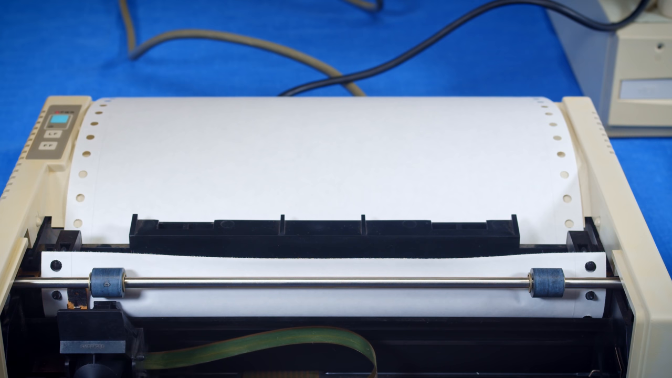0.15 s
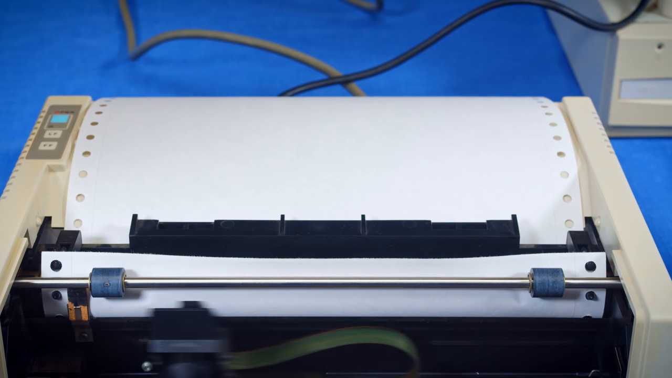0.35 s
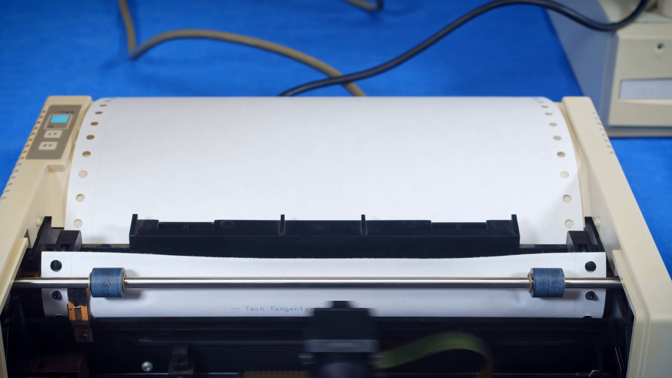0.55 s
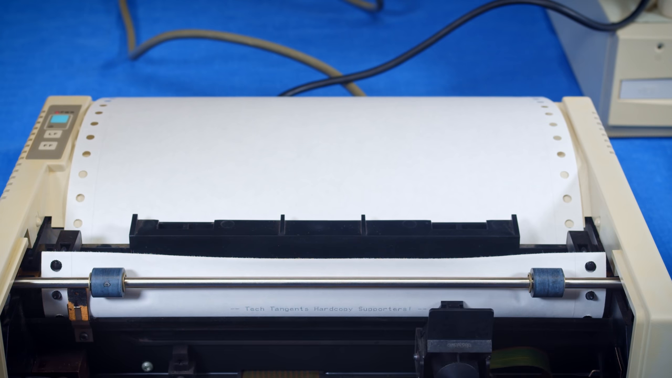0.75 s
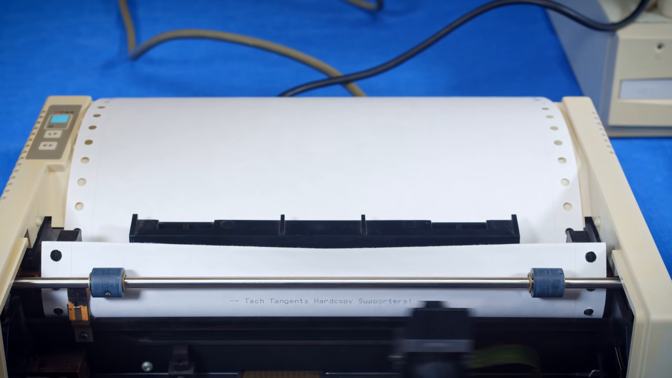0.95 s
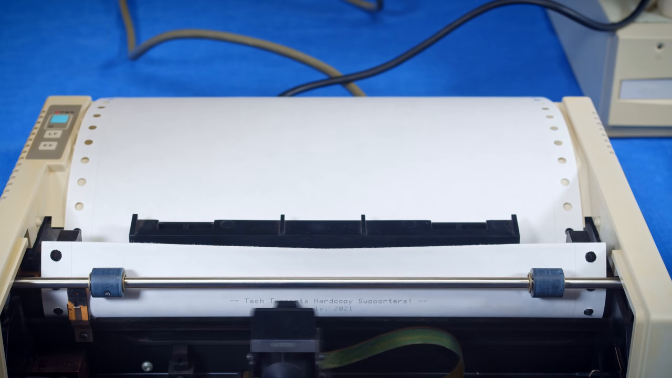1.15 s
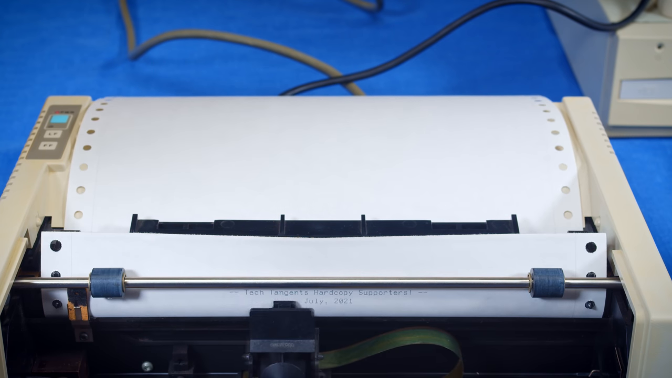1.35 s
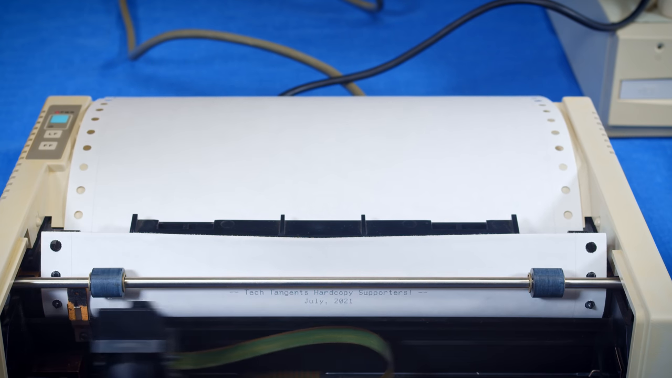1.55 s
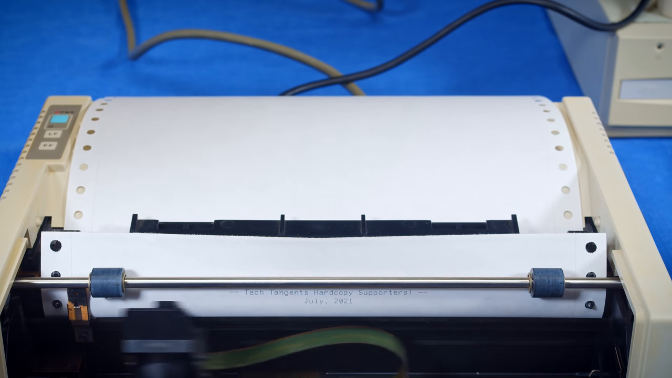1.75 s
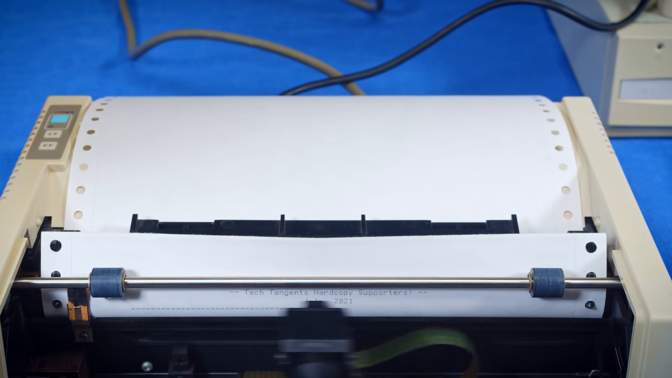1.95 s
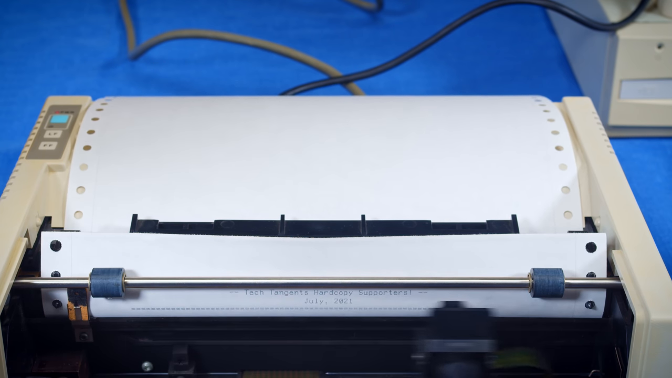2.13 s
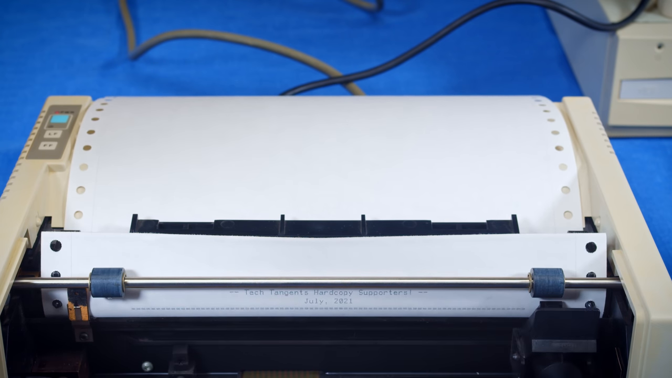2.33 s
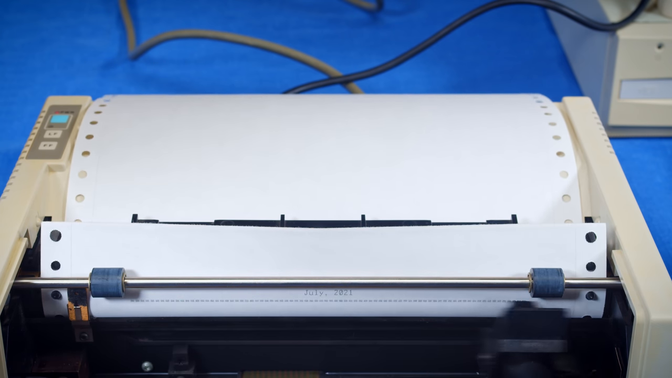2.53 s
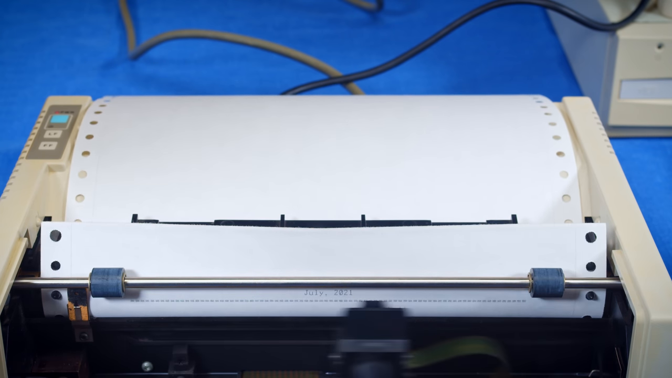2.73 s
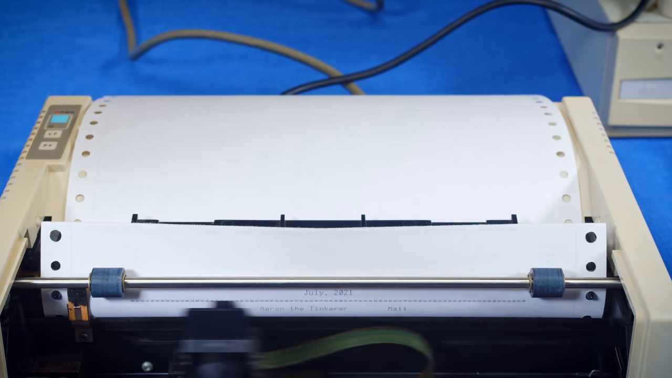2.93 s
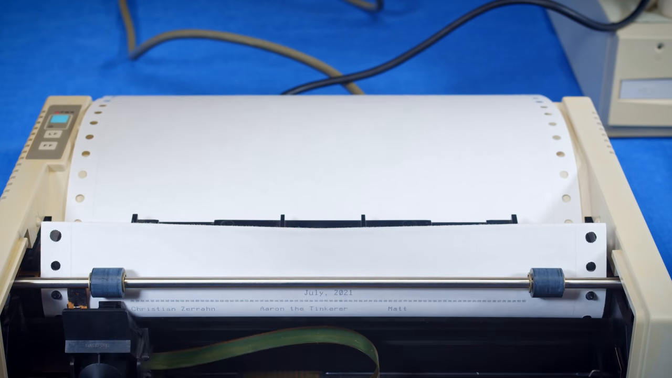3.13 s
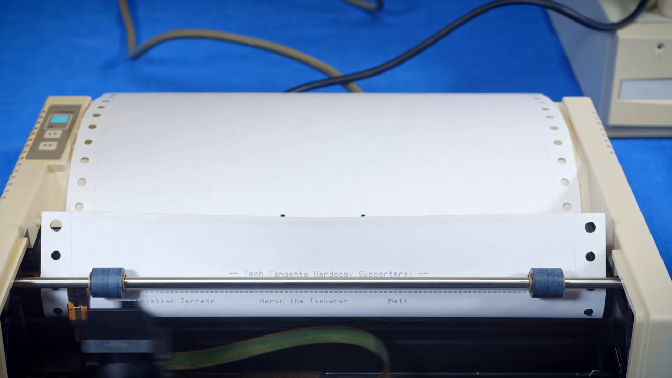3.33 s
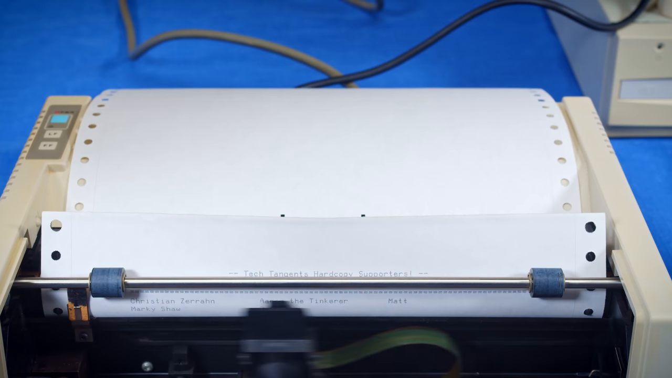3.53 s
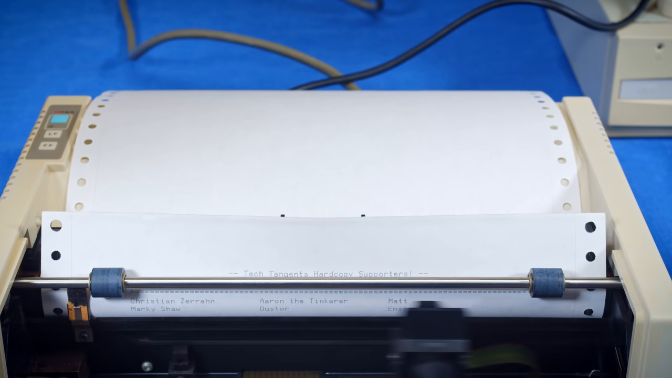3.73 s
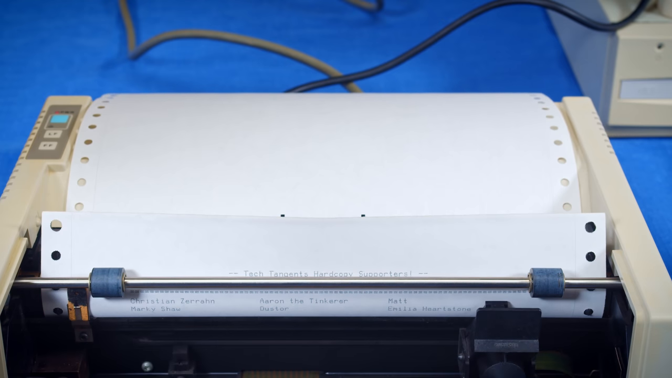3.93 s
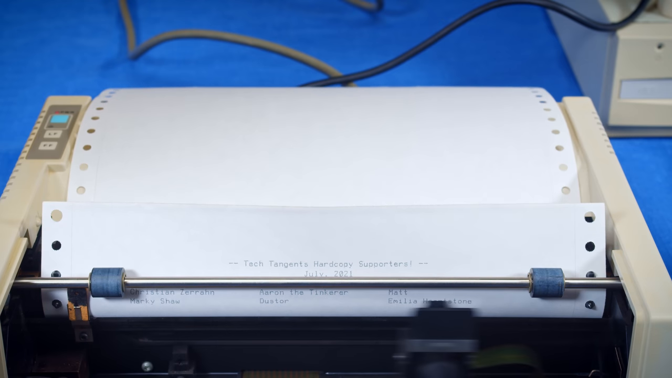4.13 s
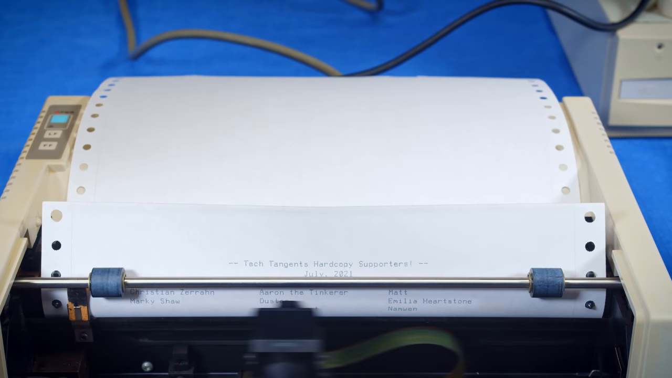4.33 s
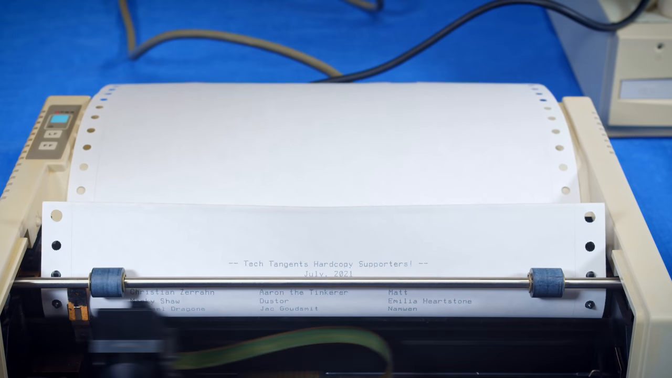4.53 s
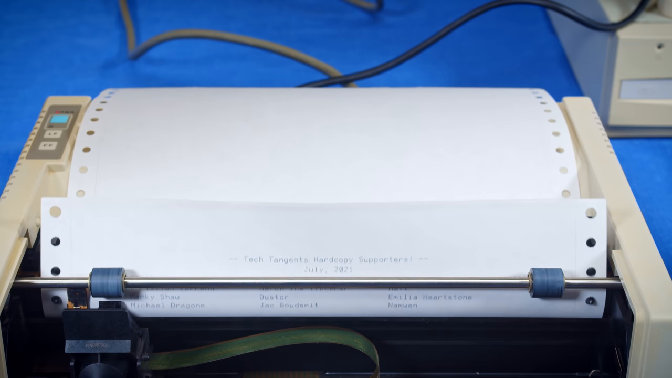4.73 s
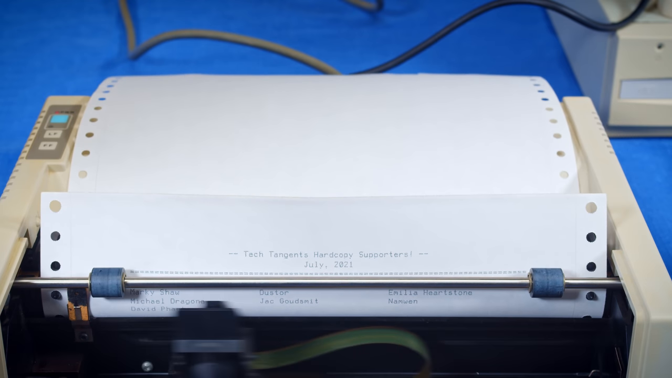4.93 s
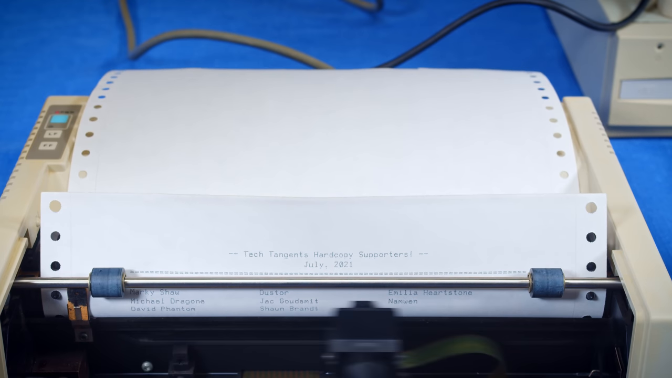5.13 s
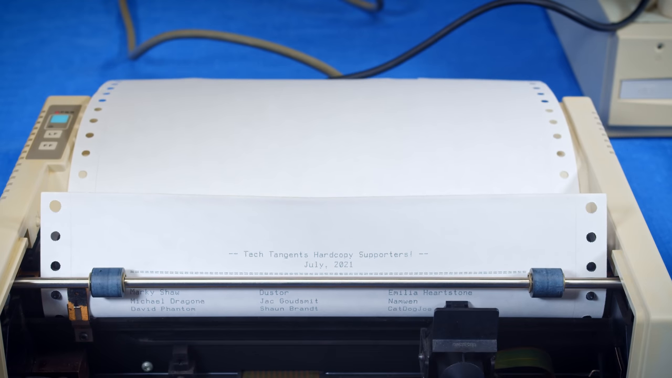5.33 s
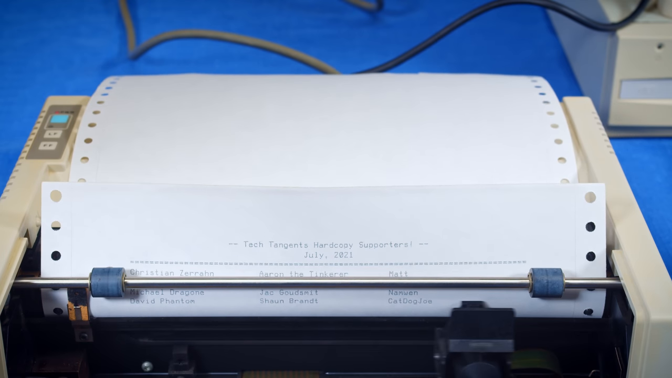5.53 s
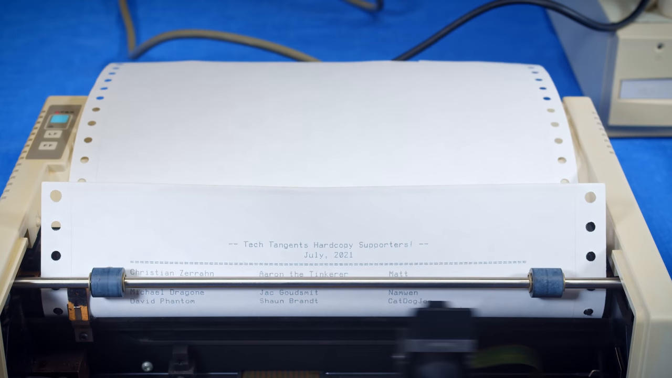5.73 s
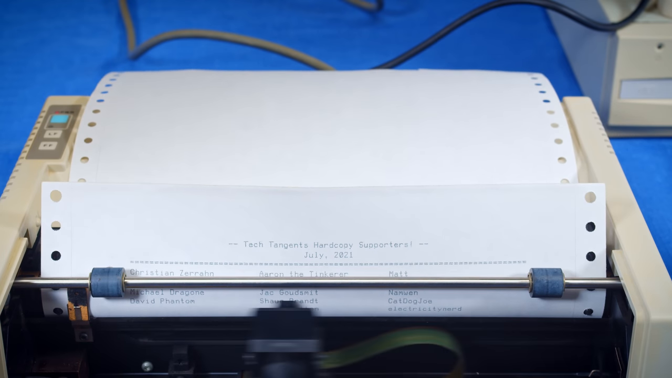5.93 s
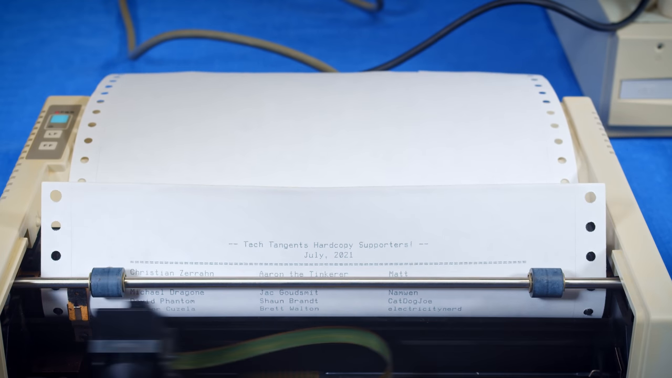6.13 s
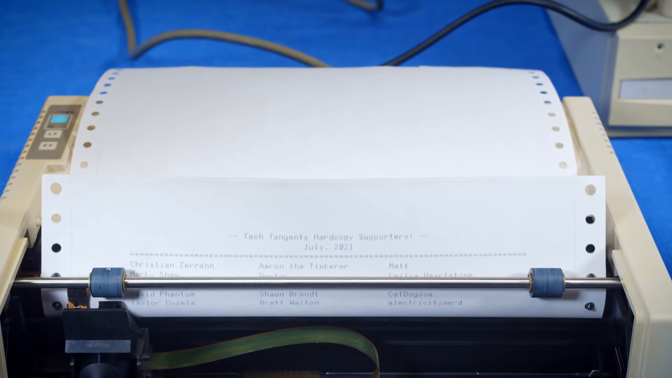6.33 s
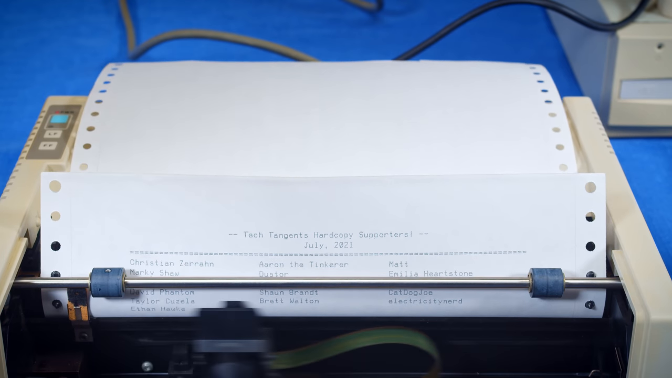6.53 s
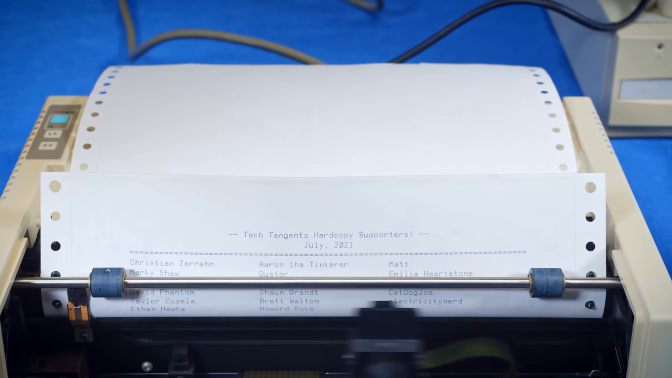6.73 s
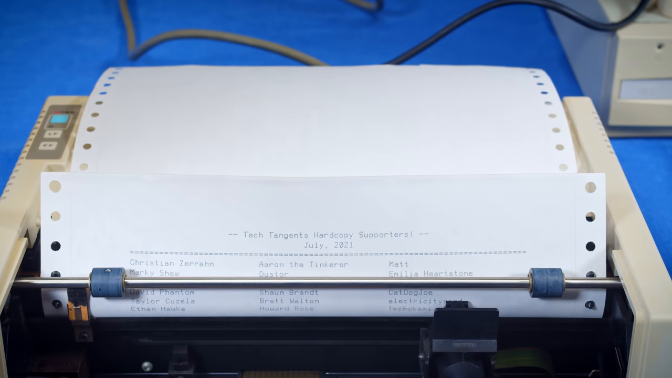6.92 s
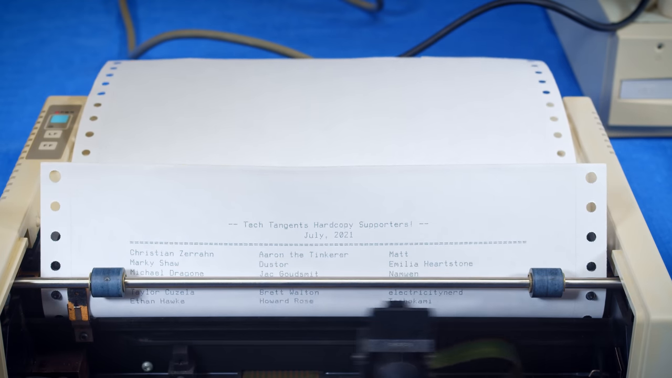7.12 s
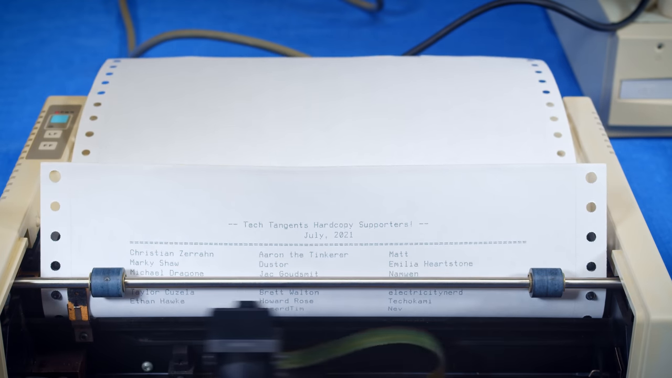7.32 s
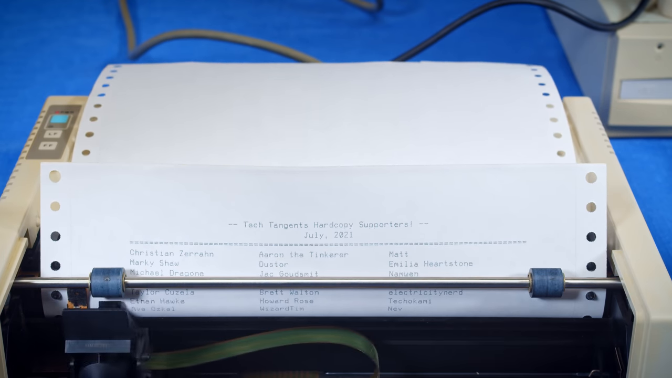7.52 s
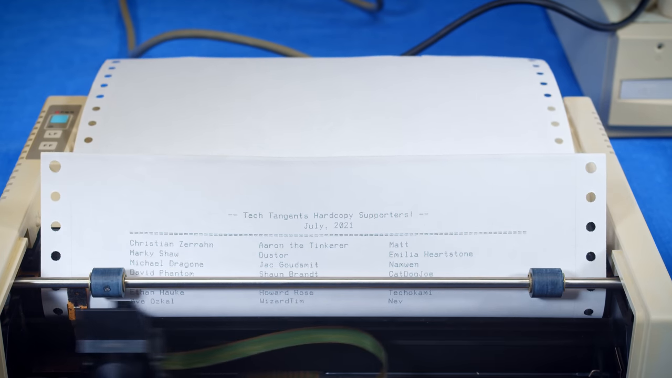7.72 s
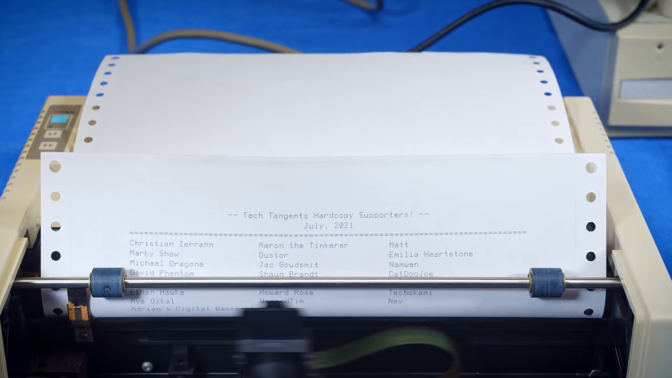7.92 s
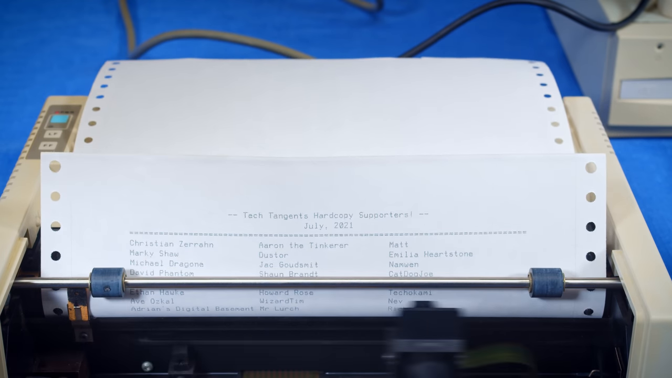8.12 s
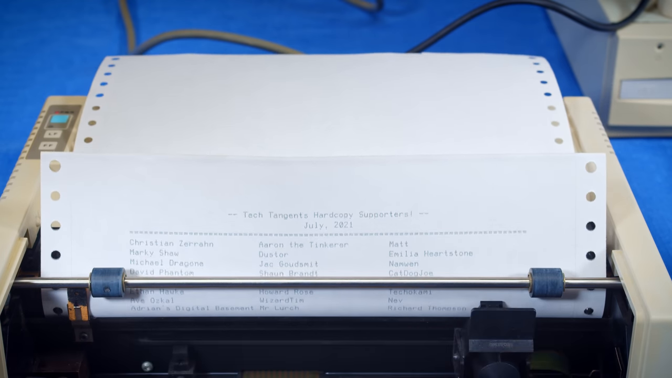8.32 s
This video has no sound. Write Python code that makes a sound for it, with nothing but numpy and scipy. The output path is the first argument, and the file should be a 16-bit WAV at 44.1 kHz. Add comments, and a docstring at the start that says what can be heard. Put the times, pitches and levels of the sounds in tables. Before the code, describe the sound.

A dot-matrix printer runs its head back and forth close up, buzzing and rattling, with sharp clacks and ticking paper feeds between passes.

```python
"""A faint scrape over room tone, then a dot-matrix printer runs its head to and fro, heard close up on its desk.
Passes start with a clack and a lurch: shaped noise rattles and hisses, sine orders of a pulley hum, a driver whines.
The head stops with a clack and the drive brakes; a clutch ticks and eight motor steps kick and drag the paper.
Snaps, clunks and clacks are crackle bursts with ringing panels; the sheet rasps in patches of noise in the first line."""
import sys
import numpy as np
from scipy import signal
from scipy.fft import rfft, irfft
from scipy.io import wavfile
from scipy.ndimage import uniform_filter1d

SR = 44100
rng = np.random.default_rng(int(sys.argv[2]) if len(sys.argv) > 2 else 0)


def wav_record(signal):
    """Record a signal, one row per channel, as 16-bit PCM in the file named by sys.argv[1]."""
    frames = np.transpose(np.atleast_2d(signal))
    bounded = np.clip(frames, -1, 1)
    # unit amplitude maps onto the largest positive 16-bit level
    quanta = np.round(bounded * 32767).astype(np.int16)
    wavfile.write(sys.argv[1], SR, quanta)


N = 373527

# Colour of the room tone: pitch_hz [Hz], level_db [relative dB per Hz]
ROOM_COLOUR = [(12, -20.5), (20, 8.5), (294, -1), (367, -14), (1990, -22), (2850, -22.5), (3360, -26),
               (5850, -23.5), (6910, -23.5), (11100, -33), (15000, -46)]
ROOM_DB = -49.5

# Snaps, clunks, a scrape and a rebound of paper, case and head: start_s [s], peak_db [dB],
# treble_db [dB above peak], knock_db [case, dB], length_ms [ms], tilt_db [dB per octave]
LOOSE_BLOWS = [(0.0716, -29.5, -10, -33, 51, -14.5), (0.128, -36, -10, -24.5, 8, -6),
               (0.9266, -2.5, -8.5, -19.5, 3.55, -3.5), (1.4704, -28, 11, -21, 2.8, 0),
               (2.4951, -22.5, -1.5, -34.5, 3.88, -9), (2.6798, -21, -17, -33.5, 3.8, -2),
               (3.3266, -26.5, -2, -31.5, 4, -9), (4.7906, -24, -4, -37, 8.4, -15),
               (4.8038, -18, -17.5, -28, 8, -16.5), (5.5506, -32, -0.5, -43.5, 2.7, 0),
               (5.5895, -28, 4, -28, 3, 0), (5.5994, -27, 6, -28, 3, 1.5), (5.6346, -32, 16, -28, 2.1, 0),
               (5.6562, -27, 5, -19.5, 2.5, 0), (5.6728, -27, 3, -22, 3.2, 4),
               (5.7673, -14, -2.5, -21, 5.4, -12), (5.7852, -28, 9, -20.5, 2.9, 0),
               (7.0413, -18, -6.5, -22, 8, -14), (8.252, -28, 2, -23.5, 2.3, 0)]
LOOSE_THUMP_DB = -35.5
# Colour of the crackle in every blow: pitch_hz [Hz], level_db [relative dB per Hz]
CRACKLE_COLOUR = [(880, -55), (1500, -20.5), (2230, -16), (2920, -15.5), (3570, -9.5), (4910, -4),
                  (6880, -14), (7230, -6), (8150, -10.5), (13500, -18), (16200, -55)]
SPIKE = 4.1  # sharp core added to crackle of rms 1
# Ringing case panels: pitch_hz [Hz], level_db [relative dB], t60_s [s]
CASE_MODES = [(494.4, -6.5, 0.12), (720, 6, 0.017), (1067, -1, 0.023), (1392, 2, 0.028), (2054, -7, 0.0279)]
# Ringing of the printer on its desk: pitch_hz [Hz], level_db [relative dB], t60_s [s]
DESK_MODES = [(93.3, -4, 0.16), (134.6, 6.5, 0.16), (174, 2, 0.071), (237.6, -0.5, 0.1984)]

# Head passes: start_s [s], stop_s [s], mark_s [s, pulley passes its mark], way [0 back, 1 out],
# rattle_db [dB], hiss_db [ribbon and paper, dB above rattle], hum_db [dB on gears, ping, whine and stop strain],
# lurch_db [case, dB], swell_db [hiss in mid-pass, dB], start_clack_db [dB], stop_clack_db [dB]
PASSES = [(0.108, 0.2214, 0.099, 1, -46.5, -10, -11, -35.5, 3.5, -16.5, -28),
          (0.3245, 0.8009, 0.563, 1, -39.5, -2, -0.5, -36.5, 2, -8.5, -25),
          (1.014, 1.249, 1.292, 0, -38, -5, -1, -36, -0.5, -28, -11.5),
          (1.4446, 1.6848, 1.5, 0, -39, -7, -1.5, -32.5, 2, -3.5, -17.5),
          (1.7695, 2.364, 1.83, 1, -40, -5, 0.5, -42, 0, -19, -34),
          (2.582, 3.185, 2.662, 0, -38.5, -5.5, -0.5, -31.5, 0, -17, -15),
          (3.401, 3.927, 3.629, 1, -40.5, -6, -1, -50, 1.5, -40, -25.5),
          (4.143, 4.6713, 4.481, 0, -38, -5.5, -1.5, -40, 0, -35.5, -14),
          (4.886, 5.3599, 5.116, 1, -40.5, -5.5, -0.5, -50, 1, -40, -18),
          (5.5666, 5.682, 5.601, 0, -40.5, -7, -4, -37, -8.5, -7, -16),
          (5.7572, 6.2707, 5.914, 0, -38.5, -6.5, -0.5, -33.5, 0.5, -14.5, -15),
          (6.453, 6.934, 6.524, 1, -40, -4.5, -1, -42.5, 0.5, -41, -19),
          (7.1217, 7.6, 7.242, 0, -38, -5.5, -1, -35, -1, -28, -14.5),
          (7.788, 8.309, 7.852, 1, -40.5, -5.5, -1, -46, 1.5, -41, -24.5)]
# Clack voices: treble_db [dB above peak], knock_db [dB], thump_db [desk, dB], length_ms [ms], tilt_db [dB per octave]
START_VOICE = (-6, -27, -32.5, 4.5, 1.5)
REBOUND_VOICE = (-3.5, -20.5, -33, 4, -6)
TICK_VOICE = (-15, -34, -38, 4, -1)
# Stop clack voices, a row for back and a row for out: same columns
STOP_VOICES = [(-5.5, -23, -30.5, 4.47, 0), (-10, -23, -48, 3.62, 0)]
# Rebound peak = REBOUND_DB + REBOUND_SHARE * start clack in dB: harder after a hard start
REBOUND_S, REBOUND_DB, REBOUND_SHARE = 0.0118, -16, 0.54
TICK_S, TICK_DB = (0.0868, 0.0908), (-27, -32.5)  # clutch tick after the stop: back, out

# Colour of the case rumble: pitch_hz [Hz], level_db [relative dB per Hz]
RUMBLE_COLOUR = [(24, -43.5), (40, -16), (91, -7), (134, -0.5), (178, -2.5), (198, -8.5), (300, -15.5),
                 (390, -46), (660, -120)]
RUMBLE_DB, LURCH_S = -54.5, 0.024  # steady rumble; the lurch peaks this long after the start
STRAIN_DB, STRAIN_S = -39, 0.016  # swell around the stop before hum_db is added, and its width

MESH_HZ, TEETH = 541.0, 90  # tooth rate at full speed; teeth per pulley turn
# Tight spots, a list for back and a list for out: turn_part [0-1], bump_db [relative dB]
TIGHT_SPOTS = [
    [(0., 2), (.125, -5.5), (.31, -1.5), (.495, 2.5), (.62, -7.5), (.82, -2), (.91, -8.5)],
    [(.055, -6), (.23, -30), (.33, -0.5), (.435, -1), (.56, -11), (.735, -6), (.92, -1)],
]
# Rattle colour, a list for back and a list for out: pitch_hz [Hz], level_db [relative dB per Hz]
RATTLE_COLOUR = [
    [(150, -27.5), (300, -18), (800, -9.5), (1300, -9), (2400, -14), (3000, -13.5), (4300, -7),
     (5500, -9.5), (7000, -19), (9000, -50)],
    [(150, -28), (300, -15.5), (800, -6.5), (1300, -6.5), (2400, -7.5), (3000, -9.5), (4300, -5.5),
     (5500, -7.5), (7000, -16), (9000, -45)],
]
# Resonances and dead spots of carriage and frame: pitch_hz [Hz], width_hz [Hz], back_db [dB], out_db [dB]
FRAME = [(630, 130, 2, 6.5), (870, 136, -1.5, -6), (1130, 60, 3.5, 5.5), (1579, 51, 5.5, 6.5),
         (2206, 44, 3.5, 4), (2360, 80, -3.5, 0.5), (2703, 104, 5, 4.5), (2860, 73, -6.5, -1),
         (3840, 92, 4.5, 2), (4048, 60, -10, -2.5), (4150, 79, 5.5, 4)]
# How much rattle returns every turn: pitch_hz [Hz], share [0-1]
REPEATS = [(200, 1), (1500, 0.92), (3000, 0.63), (4000, 0.019)]
CREEP_S = 0.015  # fade-in of a head that sets off with hardly any clack
BRAKE_S, BRAKE_DB = 0.028, -9  # run-on after the stop and its drop in rattle
BRAKE_SLOWING = 0.45  # share of speed lost during the run-on
# Colour of ribbon and paper hiss: pitch_hz [Hz], level_db [relative dB per Hz]
HISS_COLOUR = [(4350, -49), (7400, 3.5), (8120, 4), (8800, 1.5), (9960, 5), (13700, -8.5), (15500, -21.5)]

# Gear tones: order [multiple of the pulley turn], back_db [dB], out_db [dB], before hum_db; every 90th is a mesh tone
GEARS = [(10, -58, -59), (14, -58, -59), (16, -61, -55), (18, -60, -60), (20, -52, -56), (22, -45, -51),
         (23, -56, -55), (24, -54, -53), (26, -51, -62), (28, -53, -54), (30, -59, -59), (39, -61, -60),
         (82, -61, -58), (84, -59, -58), (85, -53, -66), (90, -44.5, -48.5), (95, -53, -64),
         (104, -60, -62), (175, -57, -64), (180, -51, -48.5), (185, -57, -62), (190, -58, -60),
         (220, -55, -61), (264, -66, -56), (270, -58, -47.5), (360, -56, -54), (450, -59, -51),
         (720, -58, -61)]
# Part of a turn, back and out, where the low orders in the given range line up
THROB_AT, THROB_ORDERS = (0.98, 0.45), (20, 28)
SIDE_ORDERS = 5  # tones this near a mesh harmonic keep step with it: the buzz throbs five times a turn
# Once-a-turn ping, a row for back and a row for out: pitch_hz [Hz], turn_part [0-1], level_db [before hum_db], t60_s [s]
PINGS = [(2280.6, 0.95, -28.5, 0.046), (2195, 1, -34, 0.054)]
WHINE_HZ, WHINE_DB = 8413.0, -49.5  # motor driver, before hum_db
WHINE_LATE_S, WHINE_EARLY_S = 0.04, 0.015  # begins after the start, ends before the stop

# Colour of the paper rasp: pitch_hz [Hz], level_db [relative dB per Hz]
RUB_COLOUR = [(2500, -30), (4000, -3), (5300, 6), (6300, -6), (8200, -4), (12500, -2), (14500, -5),
              (16000, -20)]
RUB_S, RUB_DB, RUB_FADE_S = (0.44, 0.8), -38.5, 0.045  # from and to, level, fade at each end

# Line feeds: start_s [s], hiss_db [paper, dB before the puff shape], thump_db [third step, dB]
FEEDS = [(.915, -47.5, -28), (1.347, -44, -30), (2.482, -44, -26.5), (3.299, -46, -27), (4.042, -45, -29),
         (4.786, -44.5, -29.5), (5.468, -44, -26), (6.362, -44.5, -28.5), (7.023, -45, -29.5),
         (7.688, -46, -29.5), (8.398, -45, -31)]
STEP_S, STEPS = 0.0108, 8
# Colour of the dragged paper: pitch_hz [Hz], level_db [relative dB per Hz]
SLIDE_COLOUR = [(180, -51), (300, -5.5), (476, 0), (781, -12), (937, -9.5), (1780, -12), (3690, -8),
                (6250, -16.5), (9450, -12.5), (13600, -20), (15500, -33.5)]

# Echo decay: pitch_hz [Hz], t60_s [s]
ECHO_DECAY = [(200, 0.42), (1000, 0.14), (4000, 0.13), (12000, 0.1)]
NOTCH_HZ, EDGE_HZ = 7230, 16300  # microphone notch, also the split for clack treble; band limit


def amp(db):
    """Decibels to amplitude."""
    return 10 ** (np.asarray(db) / 20)


def evened(x):
    """Scale to rms 1."""
    return x / np.sqrt(np.mean(x ** 2) + 1e-20)


def read(points, hz):
    """Read a curve at hz, interpolating along log frequency."""
    f, value = np.transpose(points)
    return np.interp(np.log(hz + 1), np.log(f + 1), value)


def add(mix, s, sound):
    """Lay a sound into the mix at s seconds."""
    part = mix[max(round(s * SR), 0):][:len(sound)]
    part += sound[:len(part)]


def noise(spectrum, count, share=lambda hz: 1, band=(0, SR)):
    """Looping coloured noise, rms 1 inside the band before only a share of its power is kept."""
    hz = np.fft.rfftfreq(count, 1 / SR)
    gain = amp(read(spectrum, hz))
    inside = (hz >= band[0]) & (hz < band[1])
    gain /= np.sqrt(np.sum(gain[inside] ** 2) / len(hz))
    return irfft(rfft(rng.standard_normal(count)) * gain * np.sqrt(share(hz)), count)


def slow_wander(count, width):
    """Smoothed random drift of rms 1."""
    return evened(uniform_filter1d(rng.standard_normal(count), width))


def ramp(x):
    """Hold a fade between silent and full."""
    return np.clip(x, 0, 1)


def ring(modes):
    """Dying tones of a struck body, scaled to peak 1."""
    t = np.arange(SR // 4) / SR
    out = sum(amp(db - 60 * t / t60) * np.sin(2 * np.pi * hz * t) for hz, db, t60 in modes)
    return out / abs(out).max()


def room_tone():
    """Steady coloured noise of the room."""
    return amp(ROOM_DB) * noise(ROOM_COLOUR, N)


def blows():
    """List loose blows, starts, rebounds, stops and ticks as (start_s, peak_db, voice columns)."""
    rows = [(s, db, treble_db, knock_db, LOOSE_THUMP_DB, ms, tilt)
            for s, db, treble_db, knock_db, ms, tilt in LOOSE_BLOWS]
    for start, stop, _, way, *_, start_db, stop_db in PASSES:
        way = round(way)
        rebound_db = REBOUND_DB + REBOUND_SHARE * start_db
        rows += [(start, start_db, *START_VOICE),
                 (start + REBOUND_S, rebound_db, *REBOUND_VOICE),
                 (stop, stop_db, *STOP_VOICES[way])]
        if any(0 < feed[0] - stop < 0.14 for feed in FEEDS):  # the clutch ticks only ahead of a line feed
            rows += [(stop + TICK_S[way], TICK_DB[way], *TICK_VOICE)]
    return rows


def clacks():
    """Short bursts of crackle, with the case panels and the desk ringing under them."""
    out, t = np.zeros(N), np.arange(4096) / SR
    knock, thump = ring(CASE_MODES), ring(DESK_MODES)
    hz = np.fft.rfftfreq(4096, 1 / SR)
    colour_db = read(CRACKLE_COLOUR, hz)
    for s, db, treble_db, knock_db, thump_db, ms, tilt in blows():
        u = t / (max(ms, 0.3) / 1000)
        sharp_start = np.minimum(t / 0.005, 0.3) * (u < 0.5) * (ms > 15)  # for long scrapes
        shape = np.maximum(u ** 2.1, sharp_start) * np.exp(-4.2 * u)
        shape /= shape.max()
        grit = rng.standard_normal(len(t)) + SPIKE * (np.arange(len(t)) == shape.argmax())
        burst = rfft(grit * np.roll(shape, 44))
        tilt_db = tilt * np.log2(hz / 4000 + 0.082)  # tilts only the part below the split
        low = irfft(burst * amp(colour_db + tilt_db) * (hz < NOTCH_HZ))
        high = irfft(burst * amp(colour_db) * (hz >= NOTCH_HZ))
        crackle = low / abs(low).max() + amp(treble_db) * high / abs(high).max()
        add(out, s - 0.002, amp(db) * crackle)
        add(out, s, amp(min(knock_db, db + 8.5)) * knock + amp(thump_db) * thump)  # weak blows knock less
    return out


def case_rumble(t, start, stop, lurch_db, hum_db):
    """Low noise of the case, swelling after the start and into the stop."""
    u = (t - start) / LURCH_S
    lurch = amp(lurch_db) * u ** 2 * np.exp(2 - 2 * u)
    strain = amp(STRAIN_DB + hum_db) * np.exp(-((t - stop) / STRAIN_S) ** 2)
    return (amp(RUMBLE_DB) + lurch + strain) * noise(RUMBLE_COLOUR, len(t))


def tight_pulse(turn, way):
    """Loudness pulses, rms 1, as the pulley passes its tight spots."""
    pulse = 0.599
    for at, db in TIGHT_SPOTS[way]:
        distance = (turn - at + 0.5) % 1 - 0.5
        pulse = pulse + amp(db) * np.exp(-(distance / 0.025) ** 2)
    return evened(pulse)


def rattle_colour(way):
    """The broad rattle spectrum with the frame's resonances laid on it."""
    hz = np.arange(100, 10000, 20.0)
    bumps = sum(row[2 + way] * np.exp(-((hz - row[0]) / row[1]) ** 2) for row in FRAME)
    return np.transpose([hz, read(RATTLE_COLOUR[way], hz) + bumps])


def returning(hz):
    """Share of rattle power that repeats every turn."""
    return np.clip(read(REPEATS, hz), 0, 1)


def rattle_loop(way):
    """One pulley turn of repeating rattle, leaving out the orders that sound as gear tones."""
    orders = [gear[0] for gear in GEARS]
    between = lambda hz: returning(hz) * ~np.isin(np.arange(len(hz)), orders)
    return noise(rattle_colour(way), round(SR * TEETH / MESH_HZ), between, band=(3000, 6000))


def belt_rattle(turn, pulse, way, loop):
    """Fresh noise rippled by teeth and uneven in level, plus the loop that follows the pulley angle."""
    fresh = noise(rattle_colour(way), len(turn), lambda hz: 1 - returning(hz), band=(3000, 6000))
    same = loop[(turn % 1 * len(loop)).astype(int)]
    teeth = 1 + 0.089 * np.cos(2 * np.pi * TEETH * turn)
    level_drift = amp(1.84 * slow_wander(len(turn), 60) - 0.37)
    return fresh * pulse * teeth * level_drift + same * pulse ** 0.34


def paper_hiss(t, start, stop, swell_db, pulse):
    """Ribbon and paper noise that swells or sinks in mid-pass and ends at the stop."""
    swell = amp(swell_db * np.sin(np.pi * (t - start) / (stop - start)))
    return swell * noise(HISS_COLOUR, len(t), band=(8000, 13000)) * pulse ** 0.53 * (t <= stop)


def gear_phases():
    """Phases in turns, a row for back and a row for out, that set where the orders line up."""
    orders = np.array([gear[0] for gear in GEARS])
    low = (orders >= THROB_ORDERS[0]) & (orders <= THROB_ORDERS[1])
    phases = np.where(low, -np.outer(THROB_AT, orders), rng.random((2, len(GEARS))))
    mesh = np.round(orders / TEETH).astype(int)
    beside = orders - TEETH * mesh
    in_step = rng.random((2, mesh.max() + 1))[:, mesh] - np.outer(THROB_AT, beside)
    return np.where((mesh > 0) & (abs(beside) <= SIDE_ORDERS), in_step, phases)


def gear_hum(turn, late, pulse, way, phases):
    """Sines locked to the pulley: they swell at tight spots, flutter with backlash and sag in pitch on braking."""
    hush_db = 900 * late  # orders above the tooth count fade fast once the drive lets go
    hum = np.zeros(len(turn))
    for gear, phase in zip(GEARS, phases):
        level = amp(gear[1 + way] - hush_db * (gear[0] > TEETH))
        hum += level * np.sqrt(2) * np.sin(2 * np.pi * (gear[0] * turn + phase))
    hum *= 1 + 0.25 * (pulse - 1)
    hum *= amp(1.2 * slow_wander(len(turn), 900))  # backlash flutter
    return hum * amp(4.4 * np.minimum(late / 0.006, 1))  # low tones groan louder under braking


def pulley_ping(turn, way):
    """A dying tone struck once a turn."""
    hz, at, db, t60 = PINGS[way]
    since = (turn - at) % 1 * TEETH / MESH_HZ  # s at full speed
    return amp(db - 60 * since / t60) * np.sin(2 * np.pi * hz * since) * (1 - np.exp(-since / 0.0037))


def driver_whine(t, start, stop):
    """Steady high sine of the motor driver, faded in and out within the pass."""
    whine = amp(WHINE_DB) * np.sqrt(2) * np.sin(2 * np.pi * WHINE_HZ * t)
    return whine * ramp(np.minimum(t - start - WHINE_LATE_S, stop - WHINE_EARLY_S - t) / 0.011)


def head_pass(row, loops, phases):
    """One sweep: pulley angle drives rattle, hum and ping, then slows through the run-on."""
    start, stop, mark, way, rattle_db, hiss_db, hum_db, lurch_db, swell_db, start_db, _ = row
    way, t = round(way), np.arange(start, stop + BRAKE_S, 1 / SR)
    late = np.maximum(t - stop, 0)
    turn = (t - BRAKE_SLOWING * late ** 2 / (2 * BRAKE_S) - mark) * MESH_HZ / TEETH
    pulse = tight_pulse(turn, way)
    rattle_level = amp(rattle_db + BRAKE_DB * np.minimum(late / 0.0028, 1))
    rattle = rattle_level * belt_rattle(turn, pulse, way, loops[way])
    hiss = rattle_level * amp(hiss_db) * paper_hiss(t, start, stop, swell_db, pulse)
    rumble = case_rumble(t, start, stop, lurch_db, hum_db)
    tones = gear_hum(turn, late, pulse, way, phases[way]) + pulley_ping(turn, way)
    tones += driver_whine(t, start, stop)
    fade_in_s = CREEP_S if start_db < -36 else 0.0027
    edges = ramp(np.minimum((t - start) / fade_in_s, (t[-1] - t) / 0.015))
    running = ramp(np.minimum((t - start - 0.015) / 0.0065, (t[-1] - t) / 0.009))  # motor under way
    return edges * (rattle + hiss + rumble) + running * amp(hum_db) * tones


def brake_jolt():
    """Soft-edged ring of desk and case as the drive brakes."""
    jolt = amp(-28.5) * ring(DESK_MODES) + amp(-26) * ring(CASE_MODES)
    return jolt * (1 - np.exp(-np.arange(len(jolt)) / SR / 0.005))


def carriage():
    """All passes; each direction shares its repeating rattle and gear phases, outward ones end in a jolt."""
    out, jolt = np.zeros(N), brake_jolt()
    loops, phases = [rattle_loop(way) for way in (0, 1)], gear_phases()
    for row in PASSES:
        add(out, row[0], head_pass(row, loops, phases))
        add(out, row[1] + 0.012, round(row[3]) * jolt)
    return out


def paper_rub():
    """The fresh sheet rasps against the head: bright noise flaring in short narrow patches."""
    _, _, z = signal.stft(noise(RUB_COLOUR, SR // 2), SR, nperseg=512)
    across_pitch = uniform_filter1d(rng.standard_normal(z.shape), size=7, axis=0)
    patches = evened(uniform_filter1d(across_pitch, size=4, axis=1))
    rasp = evened(signal.istft(z * amp(4.5 * patches), SR, nperseg=512)[1])
    t, out = RUB_S[0] + np.arange(len(rasp)) / SR, np.zeros(N)
    fade = ramp(np.minimum(t - RUB_S[0], RUB_S[1] - t) / RUB_FADE_S)
    add(out, RUB_S[0], amp(RUB_DB) * rasp * fade)
    return out


def line_feeds():
    """Each motor step drags the paper with a short hiss and kicks the case and the desk."""
    slide, kicks = np.zeros(N), np.zeros(N)
    t = np.arange(round(1.47 * STEP_S * SR)) / SR
    puff = t / 0.00243 * np.exp(1 - t / 0.002662) + 0.15
    puff *= signal.windows.tukey(len(t), 0.2)
    for s, hiss_db, thump_db in FEEDS:
        for k in range(STEPS):
            jitter, hiss_chance, kick_chance = rng.standard_normal(3)
            at = s + STEP_S * (k + 0.099 * jitter)
            add(slide, at, amp(hiss_db + 0.76 * hiss_chance) * puff)
            kick_db = thump_db + 2.68 * kick_chance - 2.0 * abs(k - 2)  # pulls hardest around the third step
            add(kicks, at, amp(kick_db) * np.ones(1))
    body = ring(DESK_MODES) + amp(-10) * ring(CASE_MODES)
    return slide * noise(SLIDE_COLOUR, N, band=(500, 15000)) + signal.oaconvolve(kicks, body)[:N]


def echo(x):
    """Sparse taps of random sign, each band dying at its own speed."""
    taps = np.zeros(SR // 2)
    at = np.arange(150, SR // 2 - 20, 20)
    taps[at + rng.integers(0, 20, len(at))] = rng.choice([-1.0, 1.0], len(at))
    hz, t, z = signal.stft(taps, SR, nperseg=256)
    decay = amp(-60 * t / read(ECHO_DECAY, hz)[:, None])
    tail = signal.istft(z * decay, SR, nperseg=256)[1]
    return signal.fftconvolve(x, tail / np.linalg.norm(tail))[:N]


def scene():
    """The printer, its quieter echo and the room tone."""
    printer = clacks() + carriage() + paper_rub() + line_feeds()
    reflected = amp(-15) * echo(printer)
    return (printer + reflected + room_tone())[None]


def record(dry):
    """The microphone cuts deep bass and has a narrow cavity notch; then a treble roll-off and the band limit."""
    coloured = signal.lfilter(*signal.iirnotch(NOTCH_HZ, 9.0, SR), dry)
    coloured = signal.sosfilt(signal.butter(2, 38, "high", fs=SR, output="sos"), coloured)
    coloured = signal.sosfilt(signal.butter(8, 15000, fs=SR, output="sos"), coloured)
    limit = signal.firwin(511, EDGE_HZ, window=("kaiser", 9), fs=SR)
    return signal.oaconvolve(coloured, limit[None], "same")


dry = scene()
out = record(dry)
wav_record(out)
```